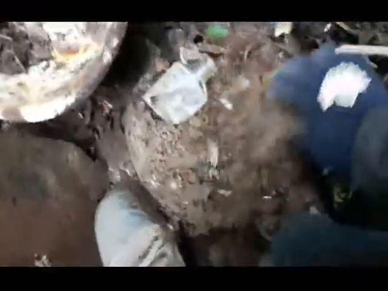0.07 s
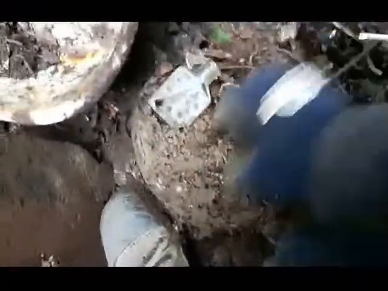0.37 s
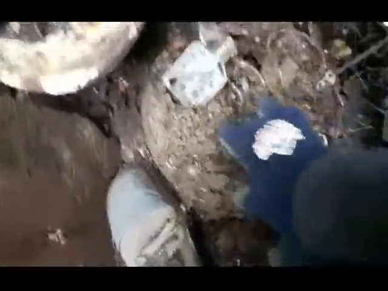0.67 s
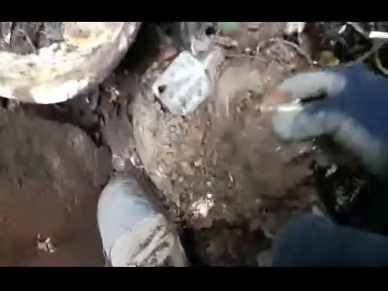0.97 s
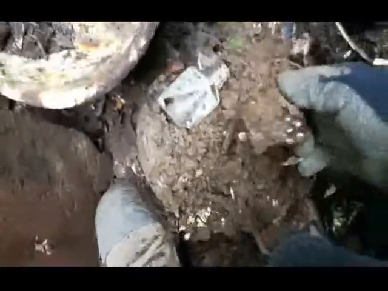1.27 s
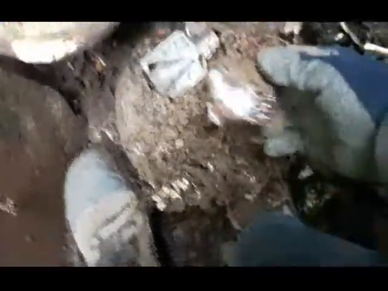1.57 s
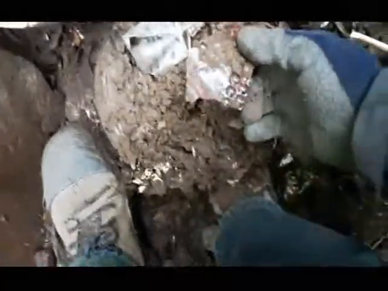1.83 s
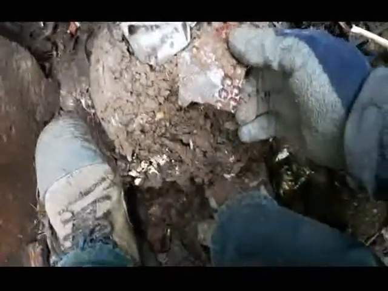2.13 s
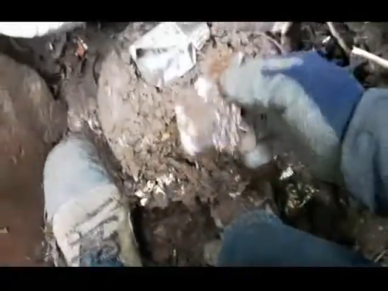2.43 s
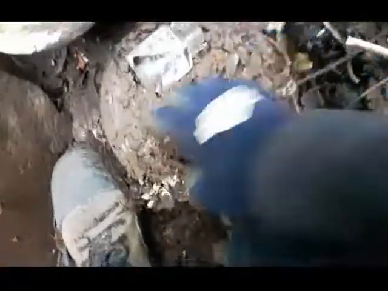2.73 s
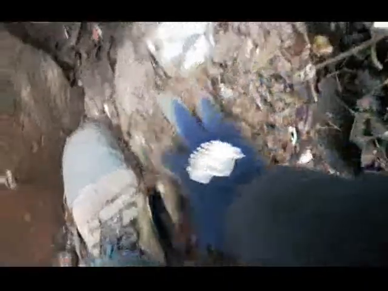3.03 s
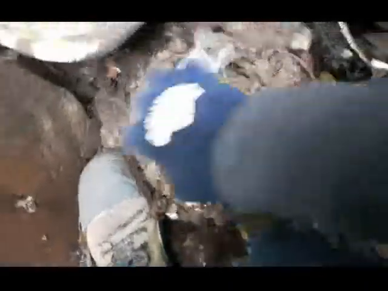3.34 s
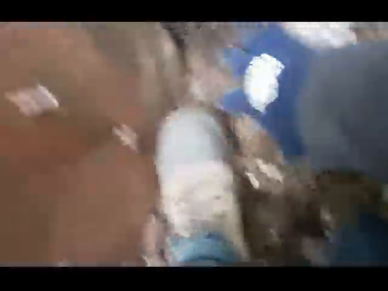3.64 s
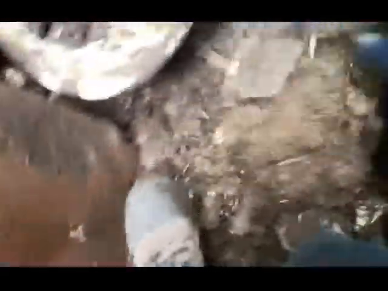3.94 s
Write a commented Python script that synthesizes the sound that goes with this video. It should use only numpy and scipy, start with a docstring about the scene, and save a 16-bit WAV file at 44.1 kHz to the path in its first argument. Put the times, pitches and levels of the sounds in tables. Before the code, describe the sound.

Close scraping through crumbly earth by hand, pausing as a shard clinks, then resuming harder.

```python
"""Raking loose soil by hand

A gloved hand rakes soil close by, outdoors: earth rubs and crumbles, grit crackles, small chips tick
and stones knock. The hand lifts a shard, which clinks in the lull, sets it down and rakes on, harder.
Wind or handling thumps and rumbles on the microphone, and brief rubs ring in it as narrow rasps.
A faint outdoor background lies underneath."""
import sys
import numpy as np
from scipy import signal
from scipy.fft import rfft, irfft, next_fast_len
from scipy.io import wavfile
from scipy.ndimage import map_coordinates

SR = 44100
rng = np.random.default_rng(int(sys.argv[2]) if len(sys.argv) > 2 else 0)


def generate_wav(signal):
    """Clip the signal to [-1, 1] and save it as 16-bit WAV at the path in sys.argv[1]."""
    frames = np.transpose(np.atleast_2d(signal))
    scaled = np.clip(frames, -1, 1) * 32767
    pcm = np.round(scaled).astype(np.int16)
    wavfile.write(sys.argv[1], SR, pcm)


N = 176400  # 4 seconds

# Tone of fine grit: frequency_hz, level_db
GRIT_TONE = [(4500, -8), (6500, -11.5), (8200, -6), (9500, -5), (11000, 1), (12500, 1.5), (14000, -4.5),
             (15800, 4.5)]
# Tone of soil crunching under a hit: frequency_hz, level_db
CRUNCH_TONE = [(100, -11), (330, -1), (700, -7), (1400, -1), (2500, -4.5), (3600, 0), (4400, -3),
               (5300, -20), (7000, -23), (10000, -14.5), (15800, -21)]
SNAP_T60_S = 0.0088  # a "t60" is the time a sound takes to fade by 60 dB


def amp(db):
    """Turn decibels into a number to multiply a sound by."""
    return 10 ** (np.asarray(db) / 20)


def unit(x):
    """Scale a sound to an average power of 1."""
    return x / np.sqrt(np.mean(x ** 2) + 1e-20)


def curves(rows):
    """Join timed points with straight lines: one curve for each column after the time."""
    times, *columns = np.transpose(rows)
    return [np.interp(np.arange(N) / SR, times, column) for column in columns]


def wobble(rate):
    """A smooth curve through `rate` random values a second."""
    return map_coordinates(rng.standard_normal(4096), [np.arange(N) * rate / SR], mode="wrap")


def coloured(x, tone):
    """Filter a sound to follow a tone table of (frequency_hz, level_db) rows."""
    size = 8192
    hz, db = np.transpose(tone)
    gain = amp(np.interp(np.log(np.fft.rfftfreq(size, 1 / SR) + 1), np.log(hz + 1), db))
    # Build the filter so that it never sounds ahead of a hit.
    cepstrum = irfft(np.log(unit(gain) + 1e-6))
    cepstrum[1:size // 2] *= 2
    cepstrum[size // 2 + 1:] = 0
    return signal.fftconvolve(x, irfft(np.exp(rfft(cepstrum))))[:N]


def noise(tone):
    """Steady noise with the given tone and a power of 1."""
    return unit(coloured(rng.standard_normal(N), tone))


def add(track, start_s, sound):
    """Mix a sound into the track."""
    part = track[max(0, round(start_s * SR)):][:len(sound)]
    part += sound[:len(part)]


def fade(t60):
    """A dying-away curve, a tenth of a second long."""
    return np.exp(-np.log(1000) * np.arange(SR // 10) / SR / t60)


def ring(hz, t60, attack_s=0.00048):
    """One pure note of a struck object: it rises fast and dies away."""
    t = np.arange(SR // 10) / SR
    shape = fade(t60) * (1 - np.exp(-(t / attack_s) ** 2))
    return shape / shape.max() * np.sin(2 * np.pi * hz * t)


def swell(start_s, length_s):
    """The loudness of one rub: it grows quickly and eases off."""
    return np.interp((np.arange(N) / SR - start_s) / length_s, [0, 0.097, 1], [0, 1, 0])


def contacts(rate, spread_db):
    """About `rate` random taps a second, mostly small; their average power is the same at any rate."""
    size = np.minimum(rng.exponential(size=N), 3.5)
    return (rng.random(N) < rate / SR) * amp(spread_db * size) / np.sqrt(rate)


def crackle(rate, tone, spread_db, t60):
    """Tiny pieces break, each with a very short puff of noise."""
    power = signal.fftconvolve(contacts(rate, spread_db) ** 2, fade(t60) ** 2)[:N]
    return unit(coloured(np.sqrt(np.abs(power)) * rng.standard_normal(N), tone))


def jostle(rate, centre_hz, octaves, t60, count=16):
    """Loose pieces of several sizes touch and ring briefly."""
    pitches = centre_hz * 2 ** (octaves * (np.arange(count) + rng.random(count) - count / 2) / count)
    return unit(sum(signal.fftconvolve(contacts(rate / count, spread_db=3.0), ring(hz, t60))[:N]
                    for hz in pitches))


def fractures(rows, t60, tone):
    """At each (start_s, level_db) row, pieces grind briefly, give way with a click and crumble."""
    before_s = np.arange(-SR // 50, 0) / SR
    grind = amp(-16) * np.exp(before_s / 0.0037)
    click = amp(-9) * fade(t60=0.0019)
    shape = np.concatenate([grind, click + fade(t60)])
    track = np.zeros(N)
    for start_s, db in rows:
        add(track, start_s + before_s[0], amp(db) * shape)
    return coloured(track * rng.standard_normal(N), tone)


def struck(rows, notes):
    """Each (start_s, level_db) hit sets all of an object's notes ringing."""
    track = np.zeros(N)
    for start_s, db in rows:
        add(track, start_s, sum(amp(db + note_db) * ring(hz, t60) for hz, note_db, t60 in notes))
    return track


def raking():
    """The glove drags unevenly: earth rubs and crumbles, pebbles rattle, grit hisses and crackles."""
    # Strength of the raking: time_s, earth_db, grit_db
    strokes = [(0, -49.5, -59.5), (.125, -42, -50.5), (.158, -40, -49.5), (.18, -48.5, -51),
               (.21, -49.5, -53), (.33, -55.5, -58), (.48, -57.5, -65.5), (.53, -49.5, -60),
               (.6, -50.5, -60), (.72, -52.5, -62), (.82, -57.5, -58.5), (.98, -52.5, -57.5),
               (1.1, -53.5, -47), (1.2, -49, -49), (1.34, -56, -58), (1.47, -60, -63.5),
               (1.6, -66.5, -73.5), (1.95, -76, -88), (2.56, -77, -86), (2.63, -64.5, -65),
               (2.87, -73.5, -84), (2.935, -52.5, -68), (2.99, -48.5, -63), (3.04, -50.5, -66),
               (3.13, -47, -53.5), (3.24, -52, -57.5), (3.42, -57, -64.5), (3.5, -51.5, -61.5),
               (3.56, -50.5, -50.5), (3.68, -48, -55.5), (3.74, -42, -51), (3.8, -34.5, -39.5),
               (3.92, -38, -37), (4, -38, -35)]
    # Tone of rubbed earth: frequency_hz, level_db
    earth_tone = [(90, -38.5), (180, -8), (320, 3.5), (500, -2.5), (780, -5.5), (1000, -8.5), (1350, -1.5),
                  (1700, -8.5), (2000, -7), (2650, -16.5), (3600, -5.5), (4300, -12.5), (5000, -21),
                  (6500, -29.5), (10400, -32.5), (16000, -65.5)]
    earth_db, grit_db = curves(strokes)
    drag_db = 1.6 * wobble(rate=55)
    usual_db = -51
    crowd = amp(0.89 * np.maximum(earth_db - usual_db, 0))  # a harder stroke moves more pieces at once
    rub = amp(-4.5) * noise(earth_tone)
    crumbs = amp(-3.5) * crackle(600 * crowd, earth_tone, spread_db=3.2, t60=0.0088)
    pebbles = amp(-8) * jostle(320 * crowd, centre_hz=1500, octaves=2.51, t60=0.014)
    hiss = amp(-2) * noise(GRIT_TONE)
    grains = amp(-0.5) * crackle(170 * crowd, GRIT_TONE, spread_db=4.8, t60=0.009)
    loose_chips = amp(-12) * jostle(300 * crowd, centre_hz=11000, octaves=0.8, t60=0.012)
    earth = amp(earth_db + drag_db) * (rub + crumbs + pebbles)
    grit = amp(grit_db + drag_db) * (hiss + grains + loose_chips)
    return earth + grit


def microphone_thumps():
    """Wind or handling on the microphone makes a rumble and low thumps, each a wave or two long."""
    # Low thumps: peak_s, level_db, pitch_hz
    pushes = [(0.03, -20.5, 139), (.092, -17, 116.4), (.116, -27, 131), (0.143, -21.5, 130),
              (0.193, -27, 93), (.226, -40, 105), (0.348, -34.5, 123), (.440, -37, 92), (0.471, -27.5, 98),
              (.572, -35, 470), (0.764, -37, 87), (1.336, -37, 345), (2.623, -42, 247), (2.8, -33.5, 266),
              (3.071, -36, 111), (3.096, -38, 79.4), (3.175, -37, 87.5)]
    # Loudness of the rumble: time_s, level_db
    rumble_levels = [(0, -36), (.12, -34.5), (.2, -40), (.3, -53.5), (.37, -45), (.45, -49.5), (.52, -52),
                     (.66, -52), (.78, -53.5), (.86, -57.5), (1.6, -63.5), (2.88, -66.5), (3.04, -49),
                     (3.08, -40.5), (3.25, -91), (3.48, -57.5), (3.55, -50), (3.66, -58), (4, -55.5)]
    # Tone of the rumble: frequency_hz, level_db
    rumble_tone = [(20, -54.5), (40, -12.5), (75, -3), (115, -5.5), (170, -9.5), (250, -14.5), (400, -22),
                   (700, -29), (1500, -71.5)]
    width_cycles = 0.62
    thumps = np.zeros(N)
    for peak_s, db, hz in pushes:
        cycles = (np.arange(N) / SR - peak_s) * hz
        thumps -= amp(db) * np.exp(-0.5 * (cycles / width_cycles) ** 2) * np.cos(2 * np.pi * cycles)
    rumble_db, = curves(rumble_levels)
    return thumps + amp(rumble_db) * noise(rumble_tone)


def outdoor_air():
    """A faint, steady, low hush in the background."""
    # Tone of the open air: frequency_hz, level_db
    air_tone = [(25, -26), (45, -28.5), (86, -4.5), (150, -8), (270, -11), (400, -18.5), (780, -23),
                (1400, -32), (2400, -38.5), (3650, -37.5), (5000, -45.5), (7000, -47), (11000, -47.5),
                (15500, -48)]
    return amp(-60) * noise(air_tone)


def sleeve_scuffs():
    """The sleeve scuffs dully over packed earth."""
    # Scuffs of the sleeve: start_s, level_db, length_s
    scuffs = [(0.02, -42.5, 0.11), (0.566, -42, 0.041), (1.233, -44, 0.018), (3.504, -41, 0.24),
              (3.72, -40.5, 0.056)]
    # Tone of a rub: frequency_hz, level_db
    scuff_tone = [(90, -15.5), (170, 4.5), (300, 3), (550, 4.5), (900, -6), (1500, -10), (4000, -70)]
    return sum(amp(db) * swell(start_s, length_s) for start_s, db, length_s in scuffs) * noise(scuff_tone)


def chips():
    """Each small hard piece snaps and rings at its own high pitch, chattering against the grit."""
    # Chips and twigs ticking: start_s, ring_db, pitch_hz, ring_t60_s, snap_db
    ticks = [(.114, -42, 13600, .02, -31), (0.176, -44, 12100, .02, -29), (0.205, -26, 13300, 0.016, -29.5),
             (0.37, -54, 12800, .015, -40.5), (0.573, -49.5, 9680, 0.07, -59),
             (.639, -45, 11630, 0.014, -41), (.685, -41, 12250, 0.011, -38), (.705, -54, 12500, .015, -49),
             (.860, -48, 14800, .015, -45), (0.9456, -30, 10600, 0.022, -47),
             (0.949, -47, 5300, 0.017, -37), (0.9998, -41, 11500, .02, -34.5),
             (1.0331, -27, 12200, 0.01, -29), (1.039, -35, 11400, 0.0092, -39),
             (1.052, -30, 10430, 0.021, -30), (1.052, -32.5, 8520, 0.015, -40),
             (1.071, -38, 10460, .02, -42), (1.074, -37.5, 8450, 0.02, -33), (1.095, -49, 10900, .015, -36),
             (1.114, -49, 12500, 0.013, -40), (1.126, -48, 13200, .015, -33),
             (1.1348, -38, 8400, 0.024, -23), (1.1605, -43, 12000, 0.027, -20.5),
             (1.181, -53, 8300, .015, -39), (1.198, -35.5, 11470, .015, -38),
             (1.204, -37, 11200, 0.022, -31), (1.326, -46, 13300, .015, -38),
             (1.337, -49, 11600, .015, -44), (1.412, -61, 12100, .015, -43), (1.48, -48, 12650, .02, -38.5),
             (2.234, -60, 12500, .015, -58), (2.249, -56.5, 11440, .015, -55),
             (2.26, -55, 14900, .015, -52), (2.622, -41, 9900, 0.013, -31),
             (2.6293, -33.5, 12770, 0.017, -49), (2.672, -46, 9350, 0.03, -43),
             (2.919, -53, 8950, 0.015, -56), (2.94, -50, 13100, .015, -50), (2.961, -53, 11200, 0.011, -50),
             (2.969, -55, 9300, 0.028, -51), (3.003, -63, 9500, 0.011, -49),
             (3.077, -29, 12870, 0.013, -24), (3.084, -29, 12800, 0.011, -27.5),
             (3.195, -48, 10600, 0.013, -44), (3.211, -54, 8500, .015, -38), (3.219, -47, 11030, 0.09, -44),
             (3.3061, -42, 11570, 0.0094, -46), (3.309, -46, 12900, .015, -46),
             (3.357, -58, 11000, 0.013, -47), (3.522, -43.5, 10760, 0.037, -40),
             (3.562, -37, 12250, 0.017, -27), (3.605, -40, 12000, .02, -34),
             (3.634, -45, 11260, 0.017, -29), (3.707, -46.5, 11100, 0.058, -59),
             (3.718, -47, 9100, 0.032, -63), (3.873, -39, 10240, .03, -27), (3.916, -27, 10590, 0.048, -28),
             (3.968, -24, 12200, 0.027, -32)]
    rings = np.zeros(N)
    for start_s, ring_db, hz, t60, _ in ticks:
        add(rings, start_s, amp(ring_db) * ring(hz, t60))
    chatter = unit(1 + 0.45 * wobble(rate=700))
    snaps = [(start_s, snap_db) for start_s, *_, snap_db in ticks]
    return rings * chatter + fractures(snaps, SNAP_T60_S, GRIT_TONE)


def stones():
    """Each stone knocks with a few short notes, muffled by the soil that it crunches."""
    # Stones knocking: start_s, ring_db, pitch_hz, crunch_db
    knocks = [(.161, -36.5, 3850, -35), (0.506, -46, 560, -41), (0.5709, -41.5, 1100, -44.5),
              (.639, -43, 790, -42), (0.675, -30.5, 626, -47), (0.743, -56, 1460, -44),
              (0.9464, -28.5, 3800, -45), (.969, -36, 4270, -60), (0.999, -45, 1790, -48),
              (1.034, -49, 1800, -43.5), (1.0985, -41, 3080, -37.5), (1.149, -21.5, 1404, -31),
              (1.158, -40, 4350, -48), (1.195, -39.5, 1380, -45.5), (1.2, -44, 840, -43),
              (1.207, -38, 685, -49), (1.224, -40, 1400, -40), (1.2304, -26, 1313, -38),
              (1.243, -60, 1100, -44), (1.327, -59, 1260, -44), (1.3343, -33, 1266, -53),
              (1.362, -44.5, 1390, -42.5), (1.393, -43, 1390, -50), (1.768, -51, 1610, -56.5),
              (2.234, -57.5, 1930, -69), (2.26, -60, 1800, -76), (2.672, -51.5, 3730, -60),
              (2.7099, -47.5, 870, -76), (2.7555, -62, 3500, -58.5), (2.94, -47, 1840, -68),
              (3.062, -64, 1140, -43), (3.132, -52, 3300, -45), (3.1449, -26, 785, -52),
              (3.306, -36, 805, -54), (3.364, -43.5, 1270, -47.5), (3.476, -39.5, 850, -59),
              (3.515, -33, 720, -46.5), (3.561, -50, 424, -34.5), (3.603, -34.5, 930, -34.5),
              (3.634, -43, 910, -43), (3.971, -26.5, 2840, -30.5), (3.9737, -18, 1360, -38),
              (3.976, -23, 990, -36), (3.9975, -18, 4100, -54)]
    # Notes of one stone: pitch_ratio, level_db
    notes = [(0.998, 1), (1.66, -20.5), (2.44, -14), (2.9, -27)]
    # Ring time (big, low stones lie deep in the soil and barely ring): pitch_hz, t60_s
    ring_times = [(750, 0.0057), (1400, 0.016), (4000, 0.0082)]
    rings = np.zeros(N)
    for start_s, ring_db, hz, _ in knocks:
        t60 = np.interp(hz, *np.transpose(ring_times))
        for ratio, note_db in notes:
            note_hz = hz * ratio * rng.uniform(0.96, 1.04)
            add(rings, start_s, amp(ring_db + note_db) * ring(note_hz, t60, attack_s=0.00075))
    crunches = [(start_s, crunch_db) for start_s, *_, crunch_db in knocks]
    return rings + fractures(crunches, t60=0.019, tone=CRUNCH_TONE)


def microphone_rasps():
    """Brief rubs ring in the microphone as narrow, fluttering rasps."""
    # Rubs ringing in the microphone: start_s, level_db, length_s, pitch_hz
    rubs = [(1.06, -46, 0.17, 3566), (1.202, -48, 0.017, 5660), (2.978, -52.5, 0.064, 3730),
            (3.118, -47, 0.02, 3210), (3.788, -40.5, 0.26, 4140), (3.875, -39.5, 0.13, 10500)]
    flutters_per_s = 640
    t = np.arange(N) / SR
    flutter = unit(wobble(flutters_per_s))
    rasps = np.zeros(N)
    for start_s, db, length_s, hz in rubs:
        rough_note = np.sin(2 * np.pi * hz * t + wobble(flutters_per_s))
        rasps += amp(db) * swell(start_s, length_s) * rough_note
    return flutter * rasps


def shard():
    """The shard clinks brightly in the hand, then lands on stony ground with a duller clack."""
    # Clinks in the hand: start_s, level_db
    clinks = [(2.168, -39.5), (2.193, -69)]
    # Notes of the held shard: pitch_hz, level_db, t60_s
    clink_notes = [(8600, -13, .026), (11360, -10, 0.04), (13800, -1, 0.025)]
    # Hits on the ground: start_s, level_db
    clacks = [(2.6212, -27), (2.6226, -38)]
    # Notes of the landing: pitch_hz, level_db, t60_s
    clack_notes = [(532, -4, 0.013), (770, -10, 0.011), (1952, -3, 0.019), (3410, -4, 0.007),
                   (4160, -11.5, 0.0084), (9850, -18, 0.012)]
    in_hand = struck(clinks, clink_notes) + amp(-5) * fractures(clinks, SNAP_T60_S, GRIT_TONE)
    landing = struck(clacks, clack_notes) + amp(-10) * fractures(clacks, t60=0.016, tone=CRUNCH_TONE)
    return in_hand + landing


def near_echo(hits):
    """Sound scatters off the ground and the body, giving each hit a very short tail."""
    tail = fade(t60=0.037) * rng.standard_normal(SR // 10)
    return amp(-3.5) * signal.fftconvolve(hits, tail / np.linalg.norm(tail))[:N]


def scene():
    """Mix the digging, the microphone's noises and the air into one channel."""
    hits = stones() + chips() + shard()
    digging = hits + near_echo(hits) + raking() + sleeve_scuffs()
    return (digging + microphone_rasps() + microphone_thumps() + outdoor_air())[None]


def record(dry):
    """Cut away the very highest treble."""
    top_hz = 15850
    size = next_fast_len(N + SR // 2)
    return irfft(rfft(dry, size) * (np.fft.rfftfreq(size, 1 / SR) < top_hz), size)[:, :N]


dry = scene()
out = record(dry)
generate_wav(out)
```